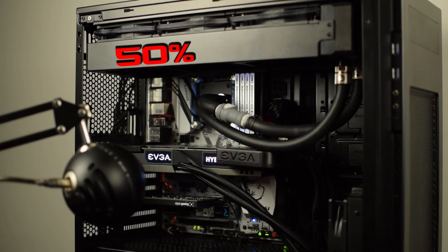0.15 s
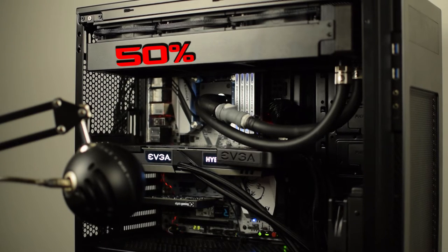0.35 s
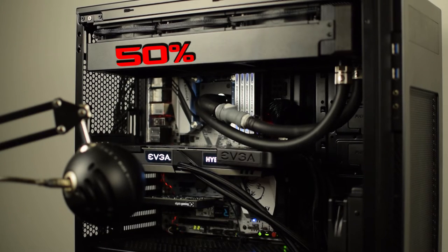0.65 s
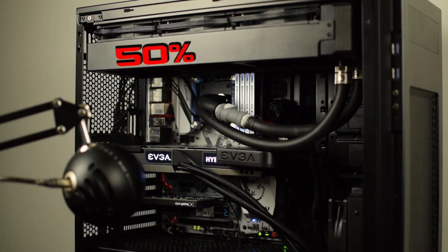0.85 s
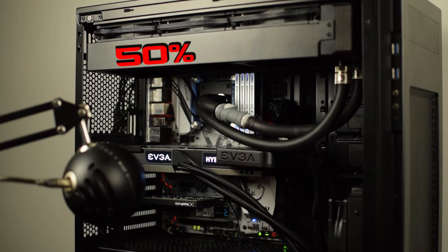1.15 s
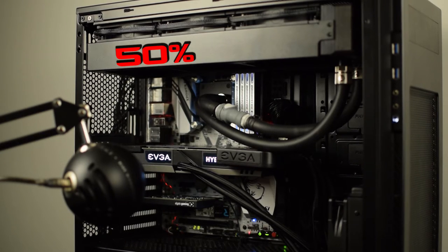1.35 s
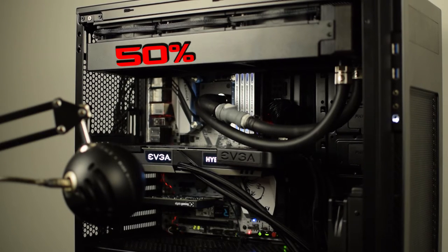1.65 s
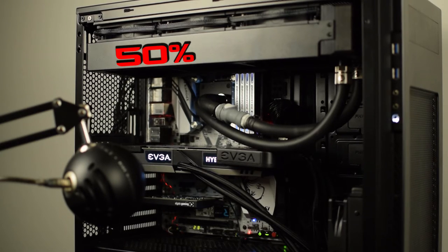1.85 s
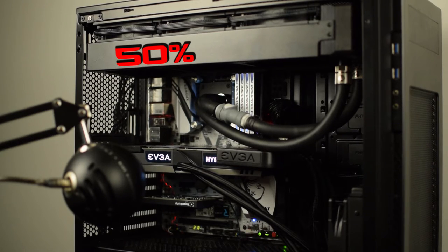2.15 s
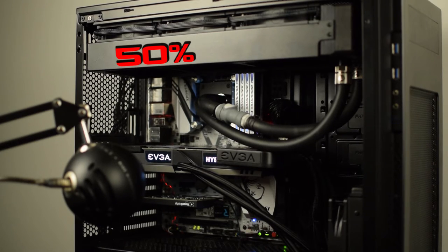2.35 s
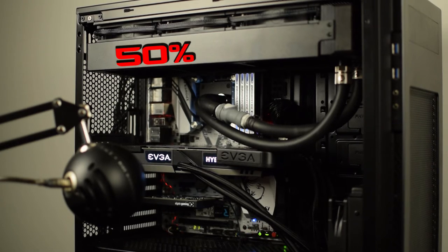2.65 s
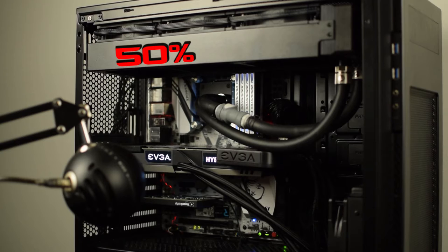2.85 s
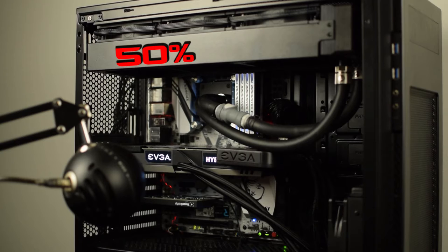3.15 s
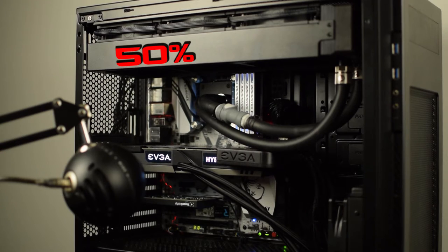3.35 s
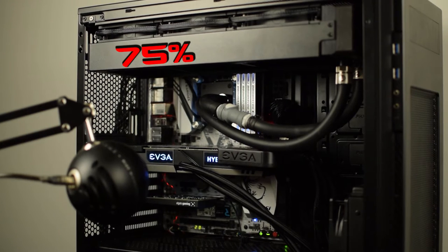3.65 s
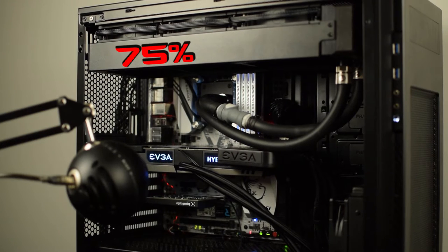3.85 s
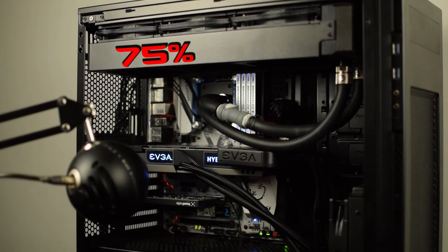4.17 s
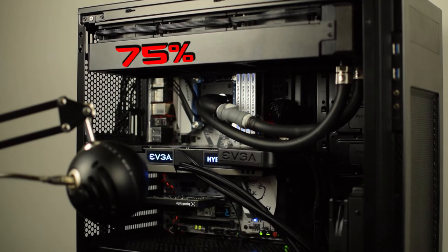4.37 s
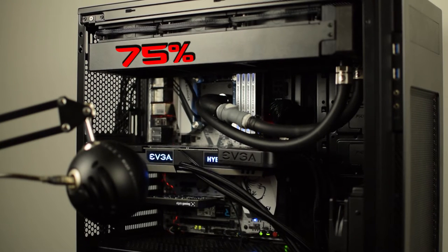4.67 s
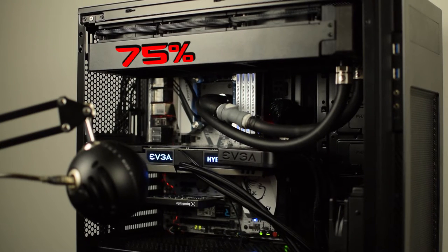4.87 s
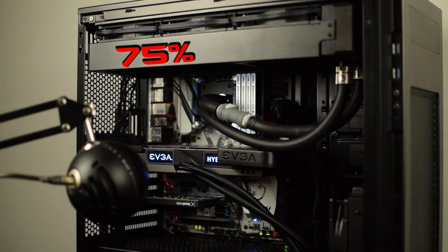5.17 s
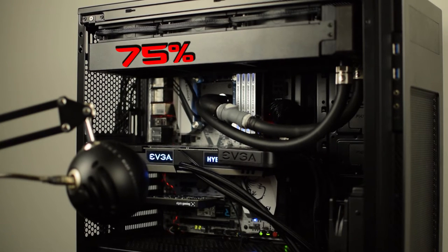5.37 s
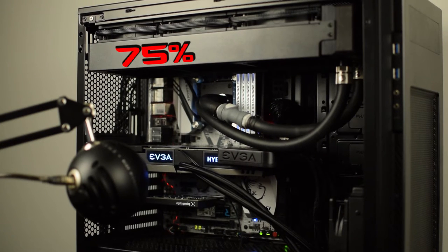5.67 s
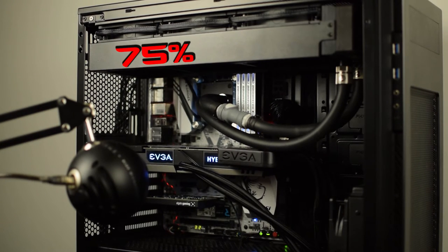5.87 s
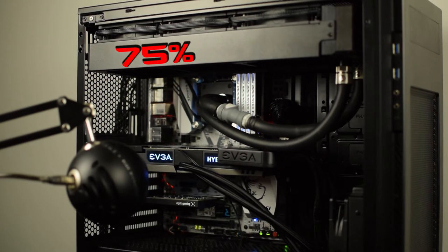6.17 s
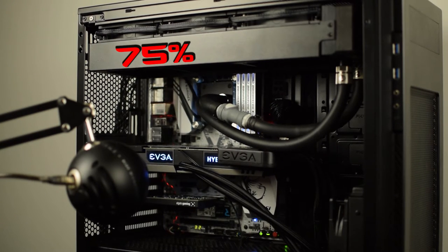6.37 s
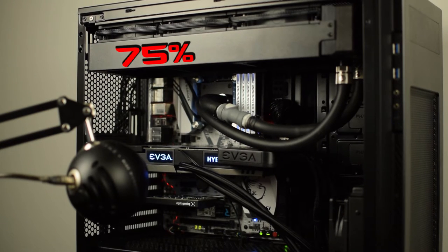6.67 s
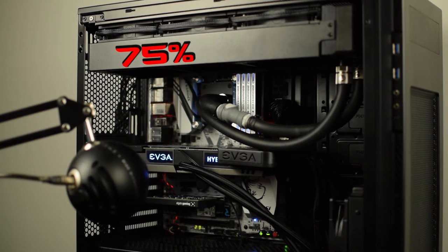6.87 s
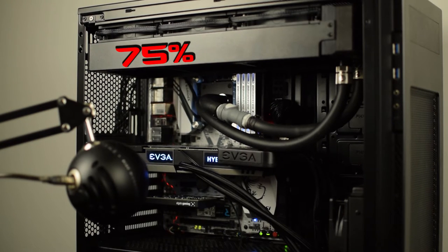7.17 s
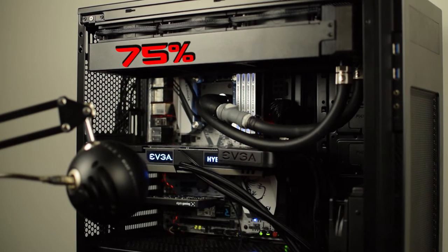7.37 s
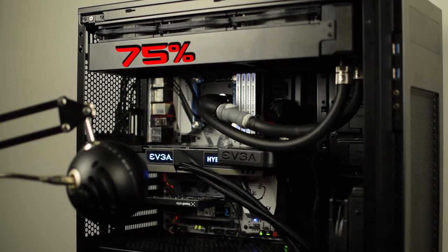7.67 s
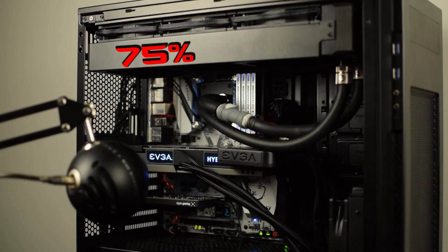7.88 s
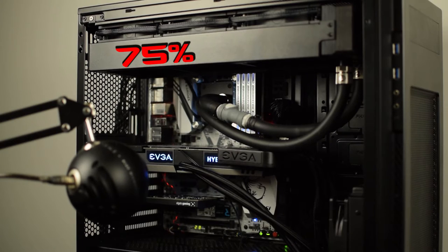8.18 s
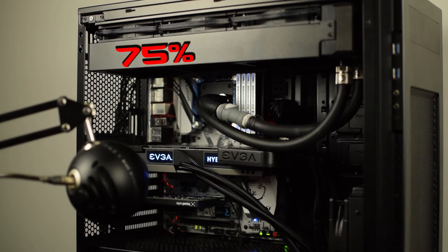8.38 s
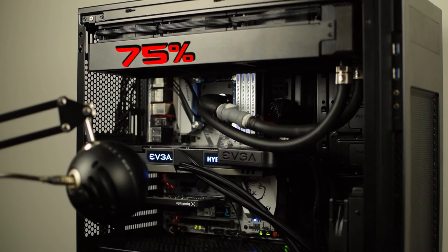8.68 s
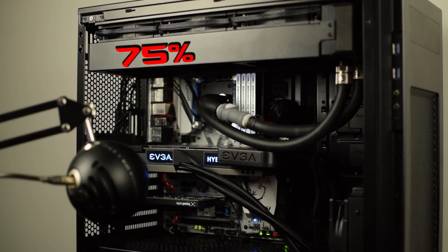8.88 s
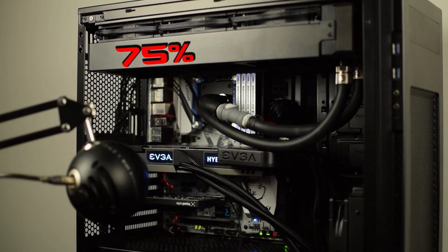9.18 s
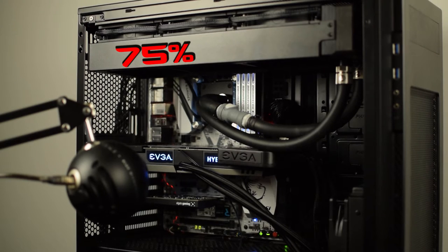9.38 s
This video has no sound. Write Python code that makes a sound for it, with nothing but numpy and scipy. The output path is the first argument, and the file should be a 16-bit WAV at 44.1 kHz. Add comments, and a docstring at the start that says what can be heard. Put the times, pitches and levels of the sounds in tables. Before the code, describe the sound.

Close beside an open computer, quiet rumbling fans drone, click sharply at an edit, and continue faster, fuller and higher, holding steady.

```python
"""An open computer case with a microphone close by: a stretch of slow radiator fans, then a stretch of fast ones,
joined by a cut that clicks. Shaped noise makes the rumbling airflow and the hiss; drifting sines make
the hums of the other fans and the blade tones, which sit at multiples of each radiator fan's turn rate.
A rotor with a rough bearing whines thinly: one turn of roughness is read round and round."""
import sys
import numpy as np
from scipy import signal
from scipy.fft import rfft, irfft
from scipy.io import wavfile
from scipy.ndimage import uniform_filter1d, map_coordinates

SR = 44100
rng = np.random.default_rng(int(sys.argv[2]) if len(sys.argv) > 2 else 0)


def log_audio(samples):
    """Write samples as a 16-bit WAV file to the path given in sys.argv[1]."""
    # one column per channel
    frames = np.atleast_2d(samples).T
    # limit to full scale, then quantise
    limited = np.clip(frames, -1, 1)
    pcm = np.round(limited * 32767).astype(np.int16)
    wavfile.write(sys.argv[1], SR, pcm)


N = 420273  # length in samples
CUT_S = 3.43652  # where the slow stretch is cut to the fast one, in seconds
# In all functions, speed is 0 for the slow stretch and 1 for the fast one.

# Small cavities where hiss and bearing ring. Each row: centre in Hz, width in Hz,
# lift when slow in dB, lift when fast in dB.
CAVITIES = [(1090, 60, 2, 3), (10200, 250, 3, 4), (11920, 400, 7, 5), (12750, 600, 3, 2),
            (13900, 400, 4, 3)]


def undb(db):
    """Turn a level in dB into a gain."""
    return 10 ** (np.asarray(db) / 20)


def walk(rate):
    """Smooth random wandering with a spread near 1: levels drawn rate times a second, averaged twice."""
    hold = int(SR / rate)
    steps = np.repeat(rng.standard_normal(N // hold + 1), hold)
    smooth = uniform_filter1d(uniform_filter1d(steps, hold), hold)
    return 1.298 * smooth[:N]


def turned(hz, waver):
    """Cycles completed by a rotor whose speed drifts with its load; waver is the drift as a fraction."""
    return np.cumsum(hz * (1 + waver * walk(2))) / SR


def tone(turns, db, swell_db):
    """A sine that follows a running count of cycles, its level swelling a little at random."""
    gain = np.sqrt(2) * undb(db + swell_db * walk(8))
    start = rng.random()
    return gain * np.sin(2 * np.pi * (start + turns))


def resonance_lift_db(f, speed, table):
    """Lift in dB that resonances give to whatever sounds near their pitch."""
    return sum(lift_db[speed] * np.exp(-2 * ((f - centre) / width) ** 2)
               for centre, width, *lift_db in table)


def air(speed):
    """Turbulent airflow: noise strongest at low pitches, with finer hiss above, fluttering a little."""
    # Airflow and wind on the microphone. Each row: pitch in Hz,
    # slow level in dB per Hz, fast steady level in dB per Hz, both before the cavities' lift.
    airflow = [(7.8, -61, -58), (50.7, -62.5, -56.5), (99.2, -61, -57.5), (150.5, -70, -63),
               (184.5, -74.5, -69), (248, -78, -74.5), (292, -80.5, -71.5), (484, -90.5, -87.5),
               (623, -97, -89), (970, -96, -92.5), (1282, -94.5, -88.5), (1430, -102, -96.5),
               (2080, -104, -95.5), (2740, -111, -104)]
    # Hiss through fins and mesh, with the peaks and dips of the case. Each row: pitch in Hz,
    # slow level in dB per Hz, fast steady level in dB per Hz, both before the cavities' lift.
    fin_hiss = [(3160, -105, -102), (3530, -107, -104), (3800, -113, -110), (3960, -102, -101),
                (4040, -108, -105), (4180, -102, -99), (4190, -104, -103), (5280, -106, -103),
                (5470, -111, -108), (5750, -110, -107), (8950, -113, -112), (11300, -116, -115),
                (14300, -117, -116), (15900, -118, -117)]
    hz, *db = np.transpose(airflow + fin_hiss)
    f = np.arange(1, N // 2 + 2) * SR / N
    # silent outside the pitches listed
    density_db = np.interp(np.log(f), np.log(hz), db[speed], -200, -200)
    density_db = density_db + resonance_lift_db(f, speed, CAVITIES)
    spectrum = rfft(rng.standard_normal(N)) * undb(density_db)
    noise = irfft(spectrum, N) * np.sqrt(SR / 2)
    flutter_db = 0.38 * walk(15)
    return undb(flutter_db) * noise


def hums(speed, waver):
    """Other fans in the case: tones whose pitch and strength drift with the load on the blades."""
    # Their pitch hardly differs between the stretches. Each row: slow pitch in Hz, fast pitch in Hz,
    # slow level in dB rms, fast level in dB rms.
    other_fans = [(135.9, 135.9, -59, -62), (388.9, 389, -74.7, -78.4), (408.3, 407.8, -63.8, -66.3),
                  (424.8, 422.6, -71.4, -72.3), (485.5, 485, -75, -76.5), (554.5, 554.5, -82, -88),
                  (736.2, 734, -77.4, -79.3), (3135, 3121.6, -93.3, -90.2), (4146.5, 4146.5, -89.4, -97),
                  (4232, 4237, -91, -95.4)]
    return sum(tone(turned(row[speed], waver), row[2 + speed], 1) for row in other_fans)


def blades(speed, waver):
    """Each radiator fan's blades and motor sound at multiples of the fan's own drifting turn rate."""
    # Each row is one radiator fan: slow turns per second, fast turns per second.
    fan_rates = [(22.97, 30.998), (22.235, 30.415)]
    # Blade and motor tones at slow speed, seven blades to a fan.
    # Each row: fan number, multiple of its turn rate, level in dB rms.
    slow_tones = [(0, 7, -59.7), (0, 36, -87), (0, 40, -86.5), (0, 43, -88), (0, 44, -88), (1, 7, -66),
                  (1, 44, -88), (1, 45, -86), (1, 48, -78.8), (1, 49, -86)]
    # The same for fast speed. Each row: fan number, multiple of its turn rate, level in dB rms.
    fast_tones = [(0, 7, -54.7), (0, 28, -73), (0, 31, -81.6), (0, 32, -70.9), (1, 7, -57.6), (1, 28, -81),
                  (1, 32, -74.5), (1, 33, -79.5), (1, 34, -79.3), (1, 35, -79.8), (1, 36, -81),
                  (1, 39, -82), (1, 40, -78.7)]
    tones = (slow_tones, fast_tones)[speed]
    turns = [turned(rates[speed], waver) for rates in fan_rates]
    return sum(tone(multiple * turns[fan], db, 0.86) for fan, multiple, db in tones)


def bearing(speed, size=32768):
    """A rough bearing repeats its pattern every turn: one turn is read over and over at a wandering speed."""
    # The rotor's turns per second: slow, fast.
    rotor_rates = (33.094, 44.63)
    # A moment in seconds at which the rotor begins a turn: slow, fast.
    turn_starts = (0, 3.5)
    # Strongest whine tones at slow speed. Each row: multiple of the rotor rate, level in dB rms.
    slow_partials = [(86, -95.5), (178, -88), (250, -89), (252, -90), (271, -90), (274, -87), (275, -89),
                     (346, -89), (359, -88), (360, -90), (362, -90)]
    # Strongest whine tones at fast speed. Each row: multiple of the rotor rate, level in dB rms.
    fast_partials = [(12, -77.8), (105, -91.6), (129, -85), (144, -86), (168, -87), (196, -88), (200, -85),
                     (205, -87), (212, -87), (265, -85)]
    # Rough spots that strike once a turn at slow speed.
    # Each row: place in the turn from 0 to 1, relative strength in dB.
    slow_knocks = [(.27, -4), (.32, 0), (.38, -3), (.76, -3), (.83, -5)]
    # Rough spots at fast speed. Each row: place in the turn from 0 to 1, relative strength in dB.
    fast_knocks = [(.26, 0), (.35, -7), (.61, -2), (.69, -3)]
    # The small metal mode that is struck, one row for slow and one for fast.
    # Each row: pitch in Hz, width in Hz of one pass of the resonance, level of all knocks in dB rms.
    metal_ring = [(10250, 250, -79.5), (10185, 270, -75)]
    # Modes of the motor housing, which lift the faint tones near them.
    # Each row: centre in Hz, width in Hz, slow lift in dB, fast lift in dB.
    housing_modes = [(5830, 220, 7, 9), (7400, 450, 6, 4), (8330, 350, 8, 4), (9000, 450, 8, 6),
                     (9550, 350, 6, 5), (11450, 300, 7, 5), (12700, 600, 3, 1), (13850, 400, 3, 2)]
    partials = (slow_partials, fast_partials)[speed]
    knocks = (slow_knocks, fast_knocks)[speed]
    rate = rotor_rates[speed]
    k = np.arange(size // 2 + 1)  # multiples of the rotor rate
    f = k * rate

    # many faint tones of random strength, sinking above 11 kHz and lifted by the resonances
    luck = np.minimum(rng.standard_normal(len(k)), 2)
    faint_db = (-103, -101)[speed] + 4.5 * luck - 6.4 * np.log2(np.maximum(f / 11000, 1))
    faint_db = faint_db + resonance_lift_db(f, speed, CAVITIES + housing_modes)
    gain = undb(faint_db) * (f > 5600) * (f < .4 * SR)
    for multiple, partial_db in partials:
        gain[int(multiple)] = undb(partial_db)
    rough = gain * np.exp(2j * np.pi * rng.random(len(k)))

    # every knock rings the same mode; a resonance applied three times swells and fades smoothly
    hz, width, ring_db = metal_ring[speed]
    strikes = sum(undb(db) * np.exp(-2j * np.pi * k * place) for place, db in knocks)
    ring = strikes / (1 + 2j * (f - hz) / width) ** 3
    ring = ring * undb(ring_db) / np.sqrt(np.sum(np.abs(ring) ** 2))

    one_turn = irfft(rough + ring, size) * size / np.sqrt(2)
    turns = np.cumsum(rate * (1 + 1.2e-4 * walk(2.5))) / SR
    place_in_turn = (turns - turns[int(turn_starts[speed] * SR)]) % 1
    whine = map_coordinates(one_turn, [place_in_turn * size], order=1, mode="grid-wrap")
    shimmer_db = 0.66 * walk(12)
    return undb(shimmer_db) * whine


def cut_click(since):
    """A click at the cut: a step in the waveform that quickly sinks back, its edge slightly rounded."""
    step_db, fall_s, rise_hz = -35.5, .006, 9000
    step = undb(step_db) * (since >= 0) * np.exp(-np.maximum(since, 0) / fall_s)
    return signal.lfilter(*signal.butter(1, rise_hz, fs=SR), step)


def scene():
    """Two stretches, slow fans and then fast fans, joined by a cut that clicks."""
    slow = air(0) + hums(0, .0005) + blades(0, .0004) + bearing(0)
    since = np.arange(N) / SR - CUT_S  # seconds since the cut
    # the fast stretch's noise starts slightly louder and eases to its steady level
    extra_db, ease_s = 0.5, 0.89
    easing = undb(extra_db * np.exp(-np.maximum(since, 0) / ease_s))
    fast = easing * air(1) + hums(1, .0008) + blades(1, .0004) + bearing(1)
    # a 4 ms crossfade centred on the cut
    share = np.clip(since / .004 + .5, 0, 1)
    fans = np.sqrt(1 - share) * slow + np.sqrt(share) * fast
    return (fans + cut_click(since))[None]


def record(dry):
    """The recorder steeply cuts everything above its top pitch."""
    top_hz = 15790
    return signal.sosfilt(signal.ellip(12, .2, 60, top_hz, fs=SR, output="sos"), dry)


dry = scene()
out = record(dry)
log_audio(out)
```